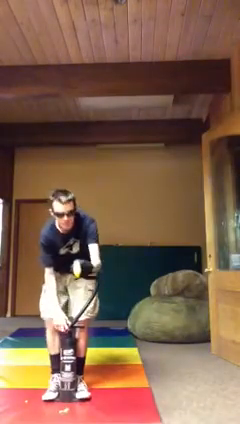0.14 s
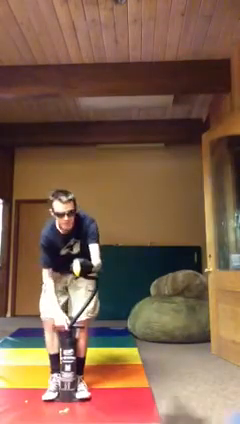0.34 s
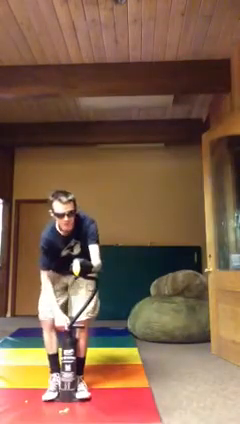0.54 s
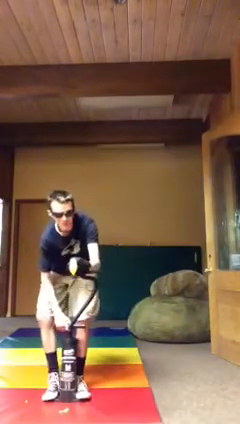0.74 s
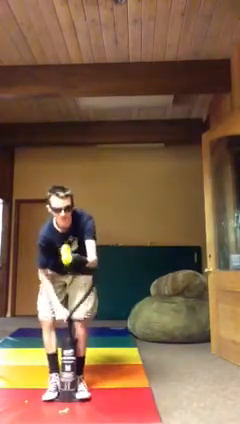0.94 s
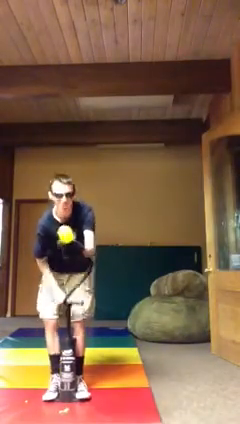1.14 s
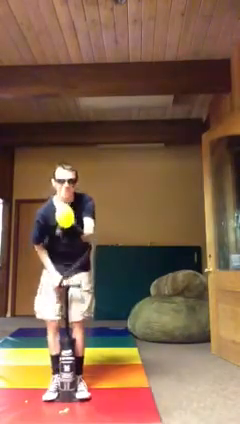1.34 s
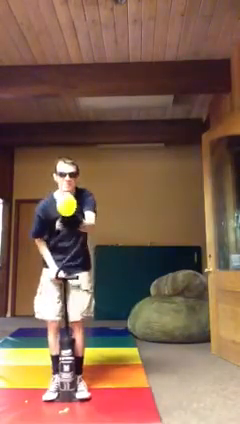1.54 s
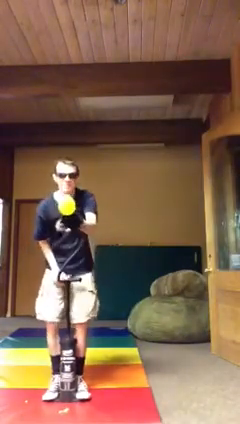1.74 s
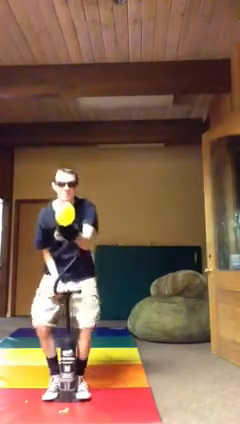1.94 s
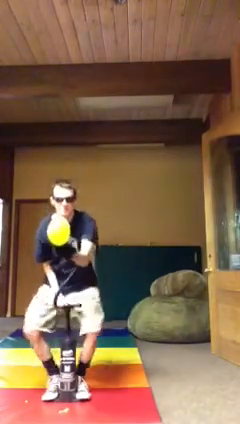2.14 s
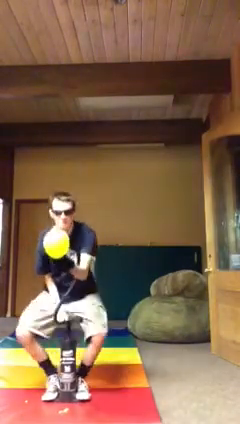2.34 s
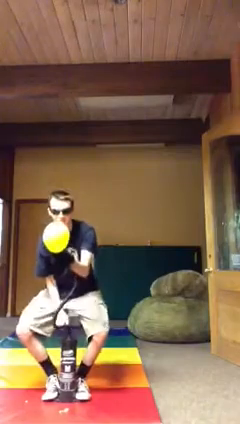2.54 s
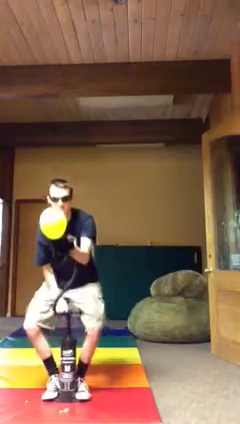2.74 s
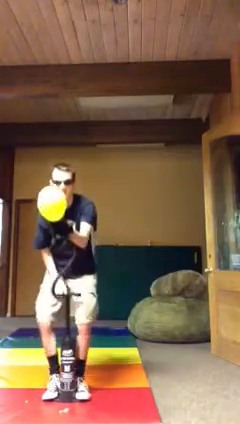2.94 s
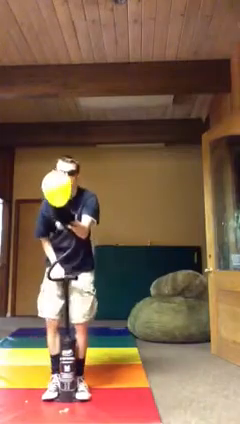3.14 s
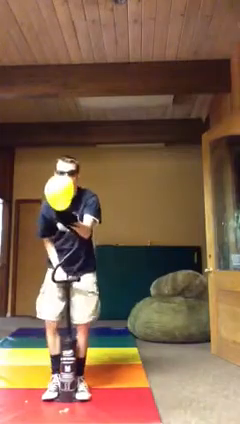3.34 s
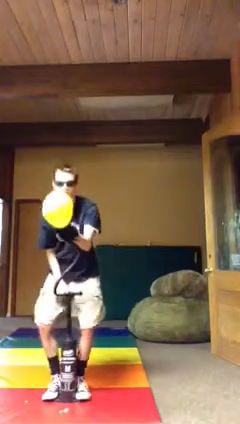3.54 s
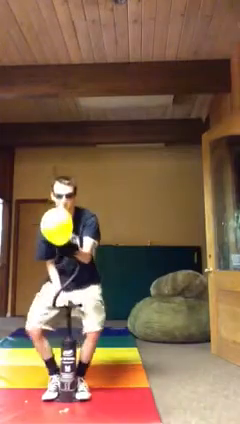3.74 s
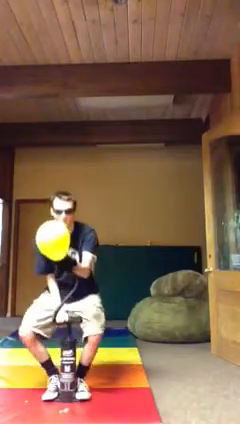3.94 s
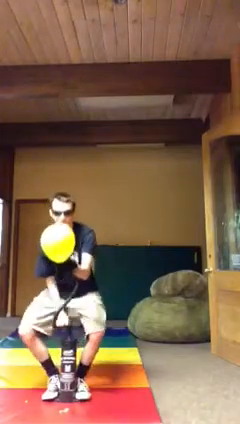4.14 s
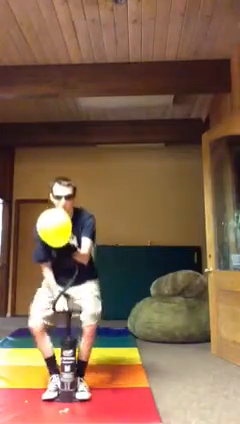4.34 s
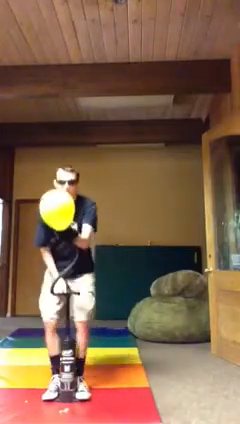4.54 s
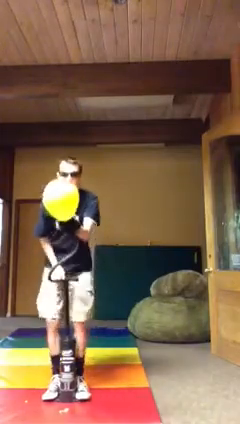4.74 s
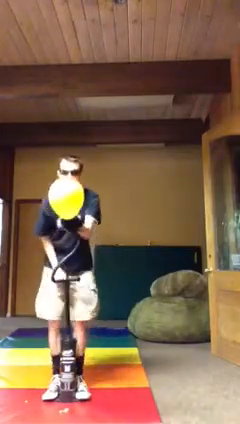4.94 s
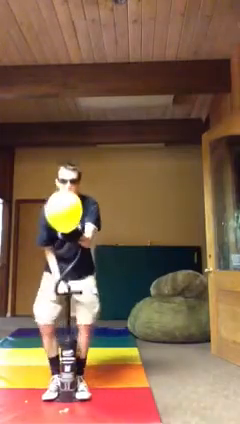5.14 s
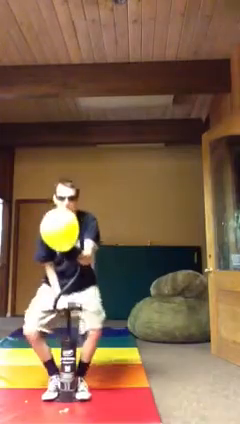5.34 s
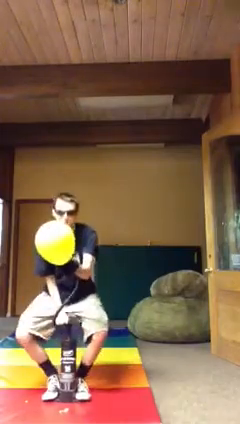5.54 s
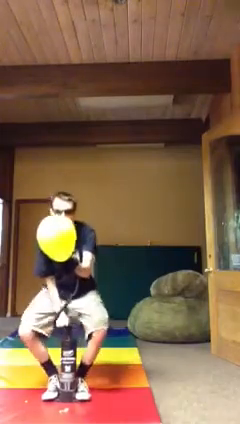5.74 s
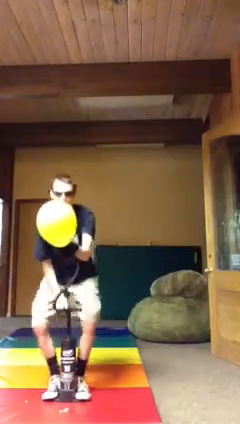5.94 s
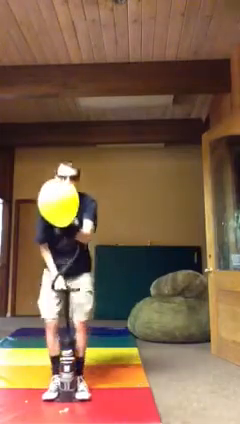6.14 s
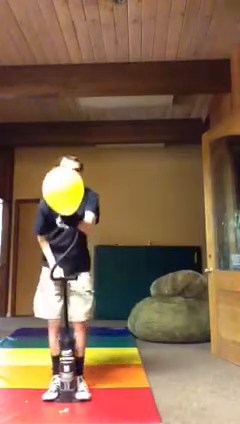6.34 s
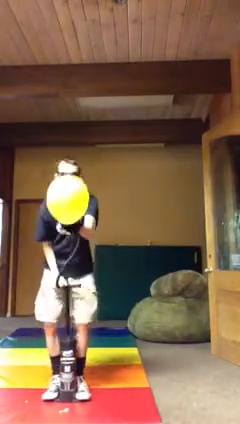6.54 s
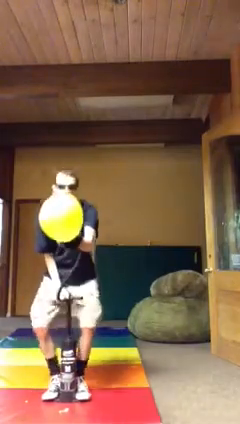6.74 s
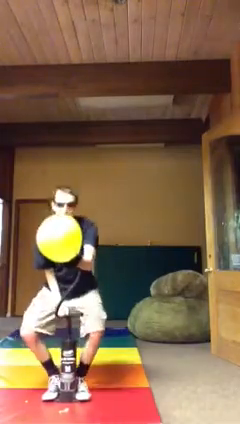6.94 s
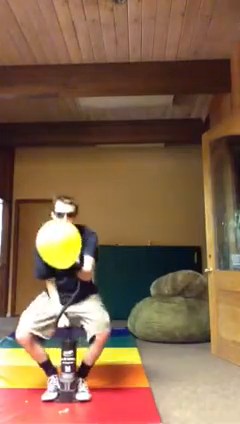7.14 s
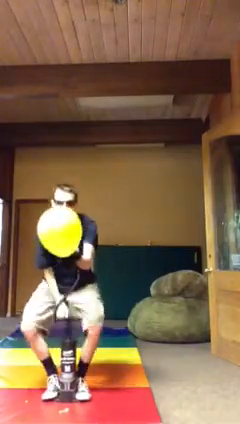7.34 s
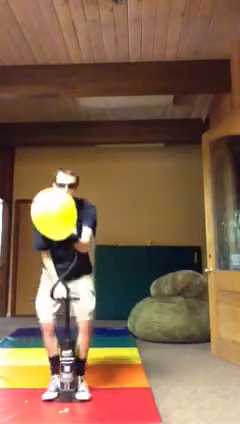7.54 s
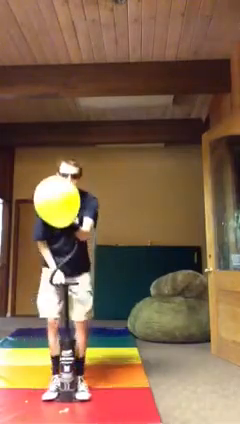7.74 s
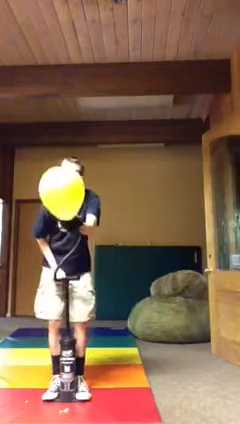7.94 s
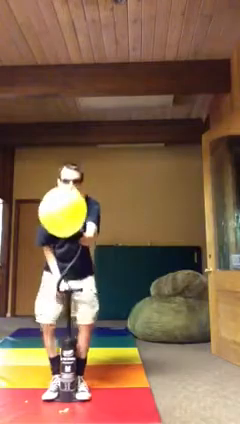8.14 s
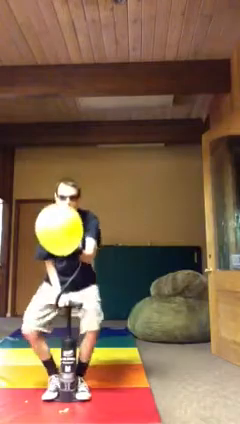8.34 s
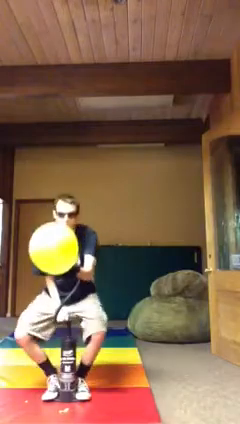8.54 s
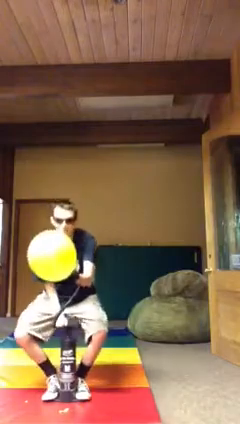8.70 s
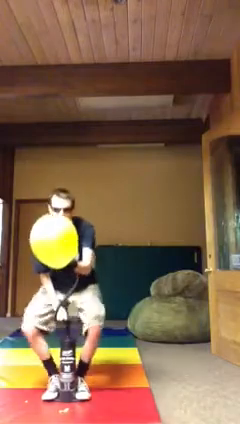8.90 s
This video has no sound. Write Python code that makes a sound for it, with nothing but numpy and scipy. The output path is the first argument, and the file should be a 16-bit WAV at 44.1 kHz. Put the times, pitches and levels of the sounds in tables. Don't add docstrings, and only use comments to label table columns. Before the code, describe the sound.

A plastic floor pump inflates a balloon, heard from a few metres on a phone microphone. After a quiet second of hum and slight rustling, hollow turbulent pulls alternate with bright, swelling valve hisses that begin with a faint rising whistle. Hard rattly clicks end the pulls; softer, thumpier knocks end the pushes. A thin leak lingers between strokes and the wooden room answers briefly.

```python
import sys
import numpy as np
from scipy import signal
from scipy.fft import rfft, irfft, next_fast_len
from scipy.io import wavfile
from scipy.ndimage import uniform_filter1d, map_coordinates

SR = 44100
rng = np.random.default_rng(int(sys.argv[2]) if len(sys.argv) > 2 else 0)


def transcribe(u):
    v = np.clip(np.atleast_2d(u).T, -1, 1)
    q = np.round(v * 32767).astype(np.int16)
    wavfile.write(sys.argv[1], SR, q)


def decibels_to_gain(level_db):
    exponent = np.asarray(level_db, float) / 20
    return 10 ** exponent


N = 395577

# (length [s], build-up [s], intake level [dB], jet level [dB], valve level [dB])
PULLS = [
    (0.56, 0.067, -43, -34.5, -32.5),
    (0.54, 0.06, -41, -37, -54),
    (0.56, 0.067, -44.5, -37, -35.5),
    (0.46, 0.036, -43, -35, -34),
    (0.53, 0.034, -44, -35.5, -34),
    (.49, 0.067, -42, -29, -40),
]
LAST_CAP_S = 9.4
# (length [s], build-up [s], jet level [dB], valve level [dB], braking [dB])
PUSHES = [
    (0.51, 0.18, -29, -36, 9.5),
    (0.49, 0.23, -30.5, -36.5, 0),
    (0.48, 0.18, -30.5, -36, 3.5),
    (0.5, .16, -30, -35, 3.5),
    (0.52, 0.17, -31.5, -35.5, 3),
]
# (time [s], half length [s], jet level [dB], intake level re jet [dB])
NUDGES = [
    (0.334, .22, -61, -20),
    (.63, 0.063, -56.5, -8.5),
]
# (first pitch [Hz], pitch before the drop [Hz], last pitch [Hz], place of the drop [0-1], level re
# intake [dB])
COLUMN = [
    (1840, 2300, 720, 0.17, 3.5),
    (1680, 1850, 1190, 0.68, 4.5),
    (1570, 1800, 770, .72, 2.5),
    (2180, 1400, 640, 0.64, -4.5),
    (2080, 1730, 680, 0.61, 0.5),
    (2010, 1600, 780, 0.7, 8),
]
# (frequency [Hz], level [dB])
INTAKE = [(120, -64), (200, -22.5), (397, -12.5), (559, -13), (787, -7), (935, -11), (1110, -4.5),
          (1670, -2.5), (4150, -2), (6480, -12), (12000, -26.5), (15600, -52), (22000, -120)]
# (frequency [Hz], level [dB])
JET = [(180, -33), (300, -23), (331, -9), (460, -15.5), (517, -21.5), (570, -14.5), (1220, -21),
       (1720, -13), (2350, -6.5), (3490, -6.5), (6320, -4), (9220, -1), (15400, -2)]
# (frequency [Hz], width [Hz], level [dB])
HOSE = [(800, 90, 4), (1110, 50, 6), (1370, 80, 4), (1480, 50, 5), (1630, 80, 5), (1960, 60, 5),
        (2090, 50, 4), (2420, 70, 4), (3010, 70, 6)]
# (frequency [Hz], width [Hz], level [dB])
VALVE = [(3290, 630, 3.5), (3990, 2150, 3), (5300, 930, -3.5)]
# (frequency [Hz], width [Hz], level [dB])
NOZZLE = [(8900, 800, 1.9), (13200, 260, 1.3), (15400, 700, 2.9)]
# (time [s], level [dB])
WHISTLE = [
    (1.82, -53),
    (3.45, -46),
    (5.055, -48),
    (6.56, -46),
    (8.09, -49),
]
# (time [s], click peak [dB], thump level re click [dB], click pitch [Hz])
TOP = [
    (1.5072, -15.5, -22, 2020),
    (3.196, -17, -21, 2040),
    (4.802, -18, -19.5, 2270),
    (6.335, -18, -19.5, 1940),
    (7.85, -16.5, -20.5, 2070),
]
# (time [s], click peak [dB], thump level re click [dB], click pitch [Hz])
BOTTOM = [
    (2.508, -26, -10, 2370),
    (4.0636, -24.5, -8, 2390),
    (5.66, -21.5, -12.5, 2340),
    (7.1473, -21, -12, 2390),
    (8.6946, -22, -11.5, 2400),
]
# (frequency [Hz], width [Hz], level [dB])
CAP = [(282, 375, 3.5), (519, 230, -9)]
# (frequency [Hz], width [Hz], level [dB])
BASE = [(285, 175, 3.5), (1800, 490, -13)]
# (delay [s], level [dB])
CAP_RATTLE = [(.0065, -12), (.0105, -8), (.0135, -7), (.017, -12), (.021, -14), (.026, -13), (.045, -18)]
# (delay [s], level [dB])
BASE_RATTLE = [(.0075, -17), (.022, -17)]
# (time [s], deep level [dB], thud level [dB])
MAT = [(1.12, -81, -60), (1.54, -81, -71.5), (2.53, -64, -60.5), (3.21, -66, -82), (4.09, -64, -63.5),
       (4.829, -68, -84), (5.67, -65, -59.5), (6.36, -67, -86), (7.16, -65, -62.5), (7.882, -72, -68),
       (8.72, -57.5, -64), (8.89, -84, -63)]
# (time [s], half length [s], level
# [dB])
FIDGET = [
    (.19, .03, -73),
    (.28, 0.051, -62.5),
    (1.504, 0.057, -36.5),
]
# (delay [s], level [dB])
WALLS = [(.006, -6), (.0094, -10), (.0122, -4), (.0194, -8), (.029, -7), (.0337, -10), (.038, -3),
         (.0423, -7), (.056, -14), (.0865, -13)]
# (frequency [Hz], width [Hz], level [dB])
STANDING = [(99, 2.2, 1), (151.4, 6.8, 22.5), (184, 5.1, 19), (228.6, 5.1, 11), (276.4, 12, 15.5),
            (313.5, 5.3, 8), (328, 3, 8), (408, 1.4, 16.5), (460, 14, -2)]
# (frequency [Hz], time to fall 60 dB [s])
ROOM = [(100, 0.3), (250, 0.57), (600, 0.53), (2000, 0.36), (10000, 0.043)]
# (frequency [Hz], level [dB])
STILL = [(18, -84), (30, -64), (108, -9.5), (213, 0), (242, 4), (314, -12.5), (349, -1.5), (441, -8),
         (516, -6.5), (15400, -24)]
# (time [s], low edge [Hz], high edge [Hz])
SPLIT = [(0.284, 11630, 13180), (1.074, 5680, 6890), (1.074, 7060, 7580), (1.4, 13090, 14560),
         (1.679, 4390, 5680), (1.679, 6200, 8270), (1.843, 6290, 8270), (2.237, 4130, 5250),
         (3.56, 5680, 6980), (3.79, 8960, 10420), (4.116, 6200, 7670), (5.001, 6200, 7670),
         (5.337, 4130, 5250), (5.337, 5680, 8960), (5.719, 5170, 6030), (5.719, 11800, 13010),
         (6.3, 5600, 6980), (6.486, 6800, 8350), (7.091, 9560, 11020)]

ONSET_DB = 9
STEEP = 1.7
INTAKE_STOP_DB_S, JET_STOP_DB_S, VALVE_STOP_DB_S, BACKWASH_STOP_DB_S = 163, 214, 258, 146
FIRST_STOP_DB_S = 83
SLOWING_S, PULL_SLOWS_DB, INTAKE_SLOWS_DB = 0.11, 2, 1.5
SURGE_DB, SURGE_S = 2.5, 0.099
OUTLET_LAG_S, OUTLET_SLOWER = 0.085, 1.23
VALVE_LAG_S, VALVE_OPENS_S = 0.033, 0.0083
VALVE_FOLLOWS = 0.3
BACKWASH_DB, BACKWASH_LEAD_S = -55.5, 0.11
LEAK_FROM_S, LEAK_GROWS_DB, LEAK_GROWS_S = 1.15, 3.5, 0.53
LEAK_JET_DB, LEAK_VALVE_DB, LEAK_INTAKE_DB, IDLE_JET_DB = -43, -53.5, -66, -80
FALL_SHARE, COLUMN_FADES_DB, COLUMN_REST_DB = 0.035, 7.5, -18
COLUMN_WAKES = 0.18
UNDER_COLUMN_DB = 2.5
DEEP_RISE_DB_S, DEEP_FALL_DB_S, DEEP_REST_DB = 260, 112, -98
THUD_RISE_DB_S, THUD_FALL_DB_S, THUD_REST_DB = 55, 29, -83
STILL_DB = -60


def unit(x):
    return x / np.sqrt(np.mean(x ** 2) + 1e-20)


def along(points, hz):
    f, v = np.transpose(points)
    return np.interp(np.log(hz + 1), np.log(f + 1), v)


def wobble(rate):
    knots = rng.standard_normal(int(N * rate / SR) + 4)
    return map_coordinates(knots, [np.arange(N) * rate / SR])


def smoothly(rule):
    coarse = np.arange(0, N + 128, 128) / SR
    return [np.interp(np.arange(N) / SR, coarse, c) for c in rule(coarse)]


def filtered(x, response):
    m = next_fast_len(N + SR)
    return irfft(rfft(x, m) * response(np.fft.rfftfreq(m, 1 / SR)), m)[:N]


def resonance(f, hz, width_hz):
    return 1j * f * width_hz / (hz * hz - f * f + 1j * f * width_hz)


def peaks(f, modes, strength=1):
    return decibels_to_gain(strength * sum(db * np.abs(resonance(f, hz, w)) ** 2 for hz, w, db in modes))


def rush(gain, patchy_db, size=(9, 5)):
    hz, t, z = signal.stft(rng.standard_normal(N), SR, nperseg=1024)
    field = uniform_filter1d(rng.standard_normal(z.shape), size[0], axis=0)
    field = uniform_filter1d(field, size[1], axis=1)
    z = z * decibels_to_gain(patchy_db * unit(field)) * gain(hz[:, None], t)
    return unit(signal.istft(z, SR, nperseg=1024)[1][:N])


def stroke(t, start, end, build_s, stop_db_s, slows_db):
    early = (start - t) / build_s
    rise_db = ONSET_DB * (np.exp(np.clip(early, None, 0)) + STEEP * np.clip(early, 0, None))
    ease_db = slows_db * np.exp(np.clip(t - end, None, 0) / SLOWING_S)
    return decibels_to_gain(-rise_db - ease_db - stop_db_s * np.clip(t - end, 0, None))


def flow(t):
    leak = stroke(t, LEAK_FROM_S, 99, 0.05, 0, 0)
    leak = leak * decibels_to_gain(-LEAK_GROWS_DB * np.exp((LEAK_FROM_S - t) / LEAK_GROWS_S))
    intake = [decibels_to_gain(LEAK_INTAKE_DB) * leak]
    valve = [decibels_to_gain(LEAK_VALVE_DB) * leak]
    jet = [decibels_to_gain(LEAK_JET_DB) * leak, decibels_to_gain(IDLE_JET_DB) + 0 * t]
    cap_times = [row[0] for row in TOP] + [LAST_CAP_S]
    for end, (length, build_s, intake_db, jet_db, valve_db) in zip(cap_times, PULLS):
        start = end - length
        late, slow_s = start + OUTLET_LAG_S, OUTLET_SLOWER * build_s
        stop_db_s = FIRST_STOP_DB_S if end == TOP[0][0] else JET_STOP_DB_S
        gulp = decibels_to_gain(intake_db + SURGE_DB * np.exp(-np.clip(t - start, 0, None) / SURGE_S))
        intake.append(gulp * stroke(t, start, end, build_s, INTAKE_STOP_DB_S, INTAKE_SLOWS_DB))
        jet.append(decibels_to_gain(jet_db) * stroke(t, late, end, slow_s, stop_db_s, PULL_SLOWS_DB))
        valve.append(decibels_to_gain(valve_db) * stroke(t, late, end, slow_s, VALVE_STOP_DB_S, PULL_SLOWS_DB))
    for (end, *_), (opens, _), (length, build_s, jet_db, valve_db, slows_db) in zip(BOTTOM, WHISTLE, PUSHES):
        start = end - length
        follows = stroke(t, start, end, build_s, 0, 0) ** VALVE_FOLLOWS
        popped = stroke(t, opens + VALVE_LAG_S, end, VALVE_OPENS_S, VALVE_STOP_DB_S, 0)
        backwash = stroke(t, opens - BACKWASH_LEAD_S, end, 0.017, BACKWASH_STOP_DB_S, 0)
        jet.append(decibels_to_gain(jet_db) * stroke(t, start, end, build_s, JET_STOP_DB_S, slows_db))
        valve.append(decibels_to_gain(valve_db) * follows * popped)
        intake.append(decibels_to_gain(BACKWASH_DB) * follows * backwash)
    for s, half, db, intake_db in NUDGES:
        puff = decibels_to_gain(db) * np.exp(-((t - s) / half) ** 2)
        jet.append(puff)
        valve.append(decibels_to_gain(-2) * puff)
        intake.append(decibels_to_gain(intake_db) * puff)
    return [10 * np.log10(np.sum(np.square(layer), axis=0) + 1e-12) for layer in (intake, valve, jet)]


def piston(t):
    ends = np.array([row[0] for row in TOP] + [LAST_CAP_S])
    lengths = np.array(PULLS)[:, 0]
    k = np.clip(np.searchsorted(ends + 0.2, t), 0, len(ends) - 1)
    travel = 1 - (ends[k] - t) / lengths[k]
    first_hz, drifted_hz, last_hz, middle, db = np.array(COLUMN)[k].T
    fallen = 1 / (1 + np.exp(np.clip((middle - travel) / FALL_SHARE, -20, 20)))
    outside = np.clip(np.maximum(COLUMN_WAKES - travel, travel - 1) / 0.25, 0, 1)
    upper_hz = first_hz + (drifted_hz - first_hz) * np.clip(travel / middle, 0, 1)
    hz = upper_hz * (last_hz / upper_hz) ** fallen
    return hz, db - COLUMN_FADES_DB * fallen + COLUMN_REST_DB * outside


def column(f, t, width_hz):
    hz, _ = piston(t)
    octave = decibels_to_gain(-25) * resonance(f, 2 * hz, width_hz) ** 2
    return np.abs(resonance(f, hz, width_hz) ** 2 + octave)


def air():
    intake_db, valve_db, jet_db = smoothly(flow)
    flutter_db = 0.5 * wobble(14)
    even_db, streak_db = 0.8, 2.2

    def force(s):
        return np.clip((flow(s)[2] + 40) / 8, -0.6, 1.3)

    def thin(f, s):
        weak, hard = np.clip(0.3 - force(s), 0, 1), np.clip(force(s) - 0.6, 0, 1)
        return (8 * weak + 5 * hard) / (1 + (f / 4000) ** 4)

    def under(f, s):
        return UNDER_COLUMN_DB * np.abs(resonance(f, 0.6 * piston(s)[0], 630)) ** 2

    def valve_gain(f, s):
        port = 1 / (1 + (3050 / (f + 1)) ** 16)
        return port * sum(decibels_to_gain(db) * np.abs(resonance(f, hz, w)) ** 2 for hz, w, db in VALVE)

    intake = rush(lambda f, s: decibels_to_gain(along(INTAKE, f) - under(f, s)) * peaks(f, HOSE), streak_db, size=(3, 9))
    barrel = rush(lambda f, s: column(f, s, width_hz=390) * peaks(f, HOSE), streak_db, size=(3, 9))
    valve = rush(valve_gain, even_db)
    jet = rush(lambda f, s: decibels_to_gain(along(JET, f) - thin(f, s)) * peaks(f, NOZZLE, force(s)), even_db)
    column_db = smoothly(piston)[1]
    pull = decibels_to_gain(intake_db + 4.5) * intake + decibels_to_gain(intake_db + column_db - 3.5) * barrel
    return decibels_to_gain(flutter_db) * (pull + decibels_to_gain(valve_db - 7.5) * valve + decibels_to_gain(jet_db + 0.55) * jet)


def whistle():
    start, db = np.transpose(WHISTLE)

    def since(t):
        return t - start[np.clip(np.searchsorted(start, t) - 1, 0, None)]

    def gain(f, s):
        return np.abs(resonance(f, 3120 + 3800 * np.clip(since(s), 0, 0.18), 280)) ** 2

    band = rush(gain, patchy_db=3.5)
    t = np.arange(N) / SR
    u = np.clip(since(t), 0, None)
    fade_db = np.interp(t - u, start, db) - 60 * u
    return band * decibels_to_gain(fade_db) * (1 - np.exp(-u / 0.005))


def knocks(events, shell, rattle, click_t60, rise, crack_db, knock_db, thump_db, thump_lag):
    clicks, blows, t = np.zeros(N), np.zeros(N), np.arange(SR // 20) / SR
    shape = decibels_to_gain(-60 * t / click_t60) * (1 - np.exp(-t / rise)) ** 2
    for s, db, low_db, hz in events:
        crack = decibels_to_gain(crack_db - 60 * t / 0.004) * rng.standard_normal(len(t))
        tones = np.sin(2 * np.pi * hz * t) + decibels_to_gain(knock_db) * np.sin(2 * np.pi * 0.46 * hz * t)
        ring = shape / shape.max() * tones
        clicks[round((s + 0.0007) * SR):][:len(t)] += decibels_to_gain(db) * (ring + crack)
        blows[round((s + thump_lag) * SR)] = decibels_to_gain(db + low_db + thump_db)

    def thump_response(f):
        rounded = 1 / (1 + 1j * f / 2500)
        return rounded * sum(decibels_to_gain(db) * resonance(f, hz, w) ** 3 for hz, w, db in shell)

    return repeats(clicks, rattle), filtered(blows, thump_response)


def rocking(t):
    s, deep_db, thud_db = np.transpose(MAT)[:, :, None]

    def peak(db, rise, fall, rest):
        return np.maximum(rest, np.max(db - np.maximum(rise * (s - t), fall * (t - s)), axis=0))

    return (peak(deep_db, DEEP_RISE_DB_S, DEEP_FALL_DB_S, DEEP_REST_DB),
            peak(thud_db, THUD_RISE_DB_S, THUD_FALL_DB_S, THUD_REST_DB))


def mat():
    deep_db, thud_db = smoothly(rocking)
    deep = rush(lambda f, s: np.abs(resonance(f, 92, 70)) ** 2, patchy_db=3)
    thud = rush(lambda f, s: np.abs(resonance(f, 198, 110)) ** 2, patchy_db=2.5)
    return decibels_to_gain(deep_db + 8.5) * deep + decibels_to_gain(thud_db + 1.0) * thud


def fidget():
    t = np.arange(N) / SR
    swell = sum(decibels_to_gain(db) * np.exp(-((t - s) / half) ** 2) for s, half, db in FIDGET)
    return swell * rush(lambda f, s: np.abs(resonance(f, 2000, 2600)) ** 2, patchy_db=2.1)


def repeats(x, table):
    return filtered(x, lambda f: 1 + sum(decibels_to_gain(db) * np.exp(-2j * np.pi * f * s) for s, db in table))


def standing(x):
    modes = list(enumerate(STANDING))
    return filtered(x, lambda f: sum((-1) ** k * decibels_to_gain(db) * resonance(f, hz, w) for k, (hz, w, db) in modes))


def room(x):
    hz, t, z = signal.stft(rng.standard_normal(SR // 2), SR, nperseg=256)
    tail = signal.istft(z * decibels_to_gain(-60 * t / along(ROOM, hz)[:, None]), SR, nperseg=256)[1]
    return signal.fftconvolve(np.pad(x, (400, 0)), tail / np.linalg.norm(tail))[:N]


def stillness():
    return decibels_to_gain(STILL_DB - 3.0) * rush(lambda f, s: decibels_to_gain(along(STILL, f)), patchy_db=0.7)


def scene():
    hiss = air() + whistle()
    cap = knocks(TOP, CAP, CAP_RATTLE, click_t60=0.0036, rise=0.00028, crack_db=-10, knock_db=-5,
                 thump_db=42.5, thump_lag=0.002)
    base = knocks(BOTTOM, BASE, BASE_RATTLE, click_t60=0.009, rise=0.0007, crack_db=-10, knock_db=-16,
                  thump_db=46.0, thump_lag=0.00079)
    clicks, thumps = np.add(cap, base)
    hits = clicks + decibels_to_gain(-14) * room(clicks)
    hits = hits + repeats(thumps, WALLS) + decibels_to_gain(-7.5) * standing(thumps) + decibels_to_gain(-10) * room(thumps)
    mono = hits + decibels_to_gain(1) * hiss + decibels_to_gain(-11.0) * room(hiss) + mat() + fidget() + stillness()
    return np.array([mono, mono])


def thinned(x):
    hz, t, z = signal.stft(x, SR, nperseg=1024)
    field = uniform_filter1d(rng.standard_normal(z.shape), size=4, axis=0)
    field = uniform_filter1d(field, size=7, axis=1)
    limit = along([(5000, 3.6), (9000, 2.2), (13500, 1.45), (15000, 2)], hz)
    z = z * (unit(field) < limit[:, None])
    split = sum(np.outer((hz > lo) & (hz < hi), np.abs(t - s) < 0.012) for s, lo, hi in SPLIT)
    side = decibels_to_gain(-0.5) * split * np.abs(z) * np.exp(2j * np.pi * rng.random(z.shape))
    return signal.istft(np.array([z + side, z - side]), SR, nperseg=1024)[1][:, :N]


def roll_off(x):
    return signal.sosfilt(signal.butter(12, 15520, fs=SR, output="sos"), x)


def record(dry):
    mic = filtered(dry[0], lambda f: (1j * f / (1j * f + 110)) ** 2 / (1 + (f / 15330) ** 300))
    mix = thinned(mic)
    return roll_off(mix)


dry = scene()
out = record(dry)
transcribe(out)
```